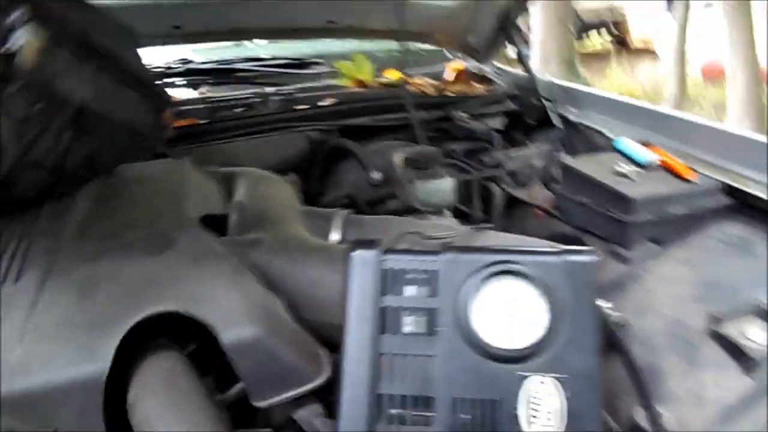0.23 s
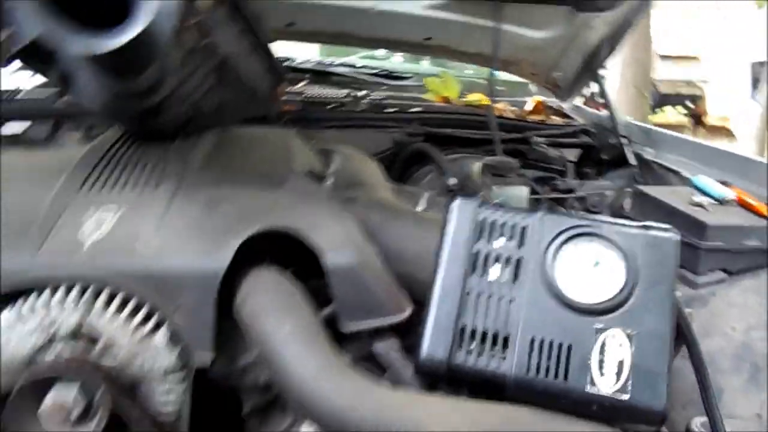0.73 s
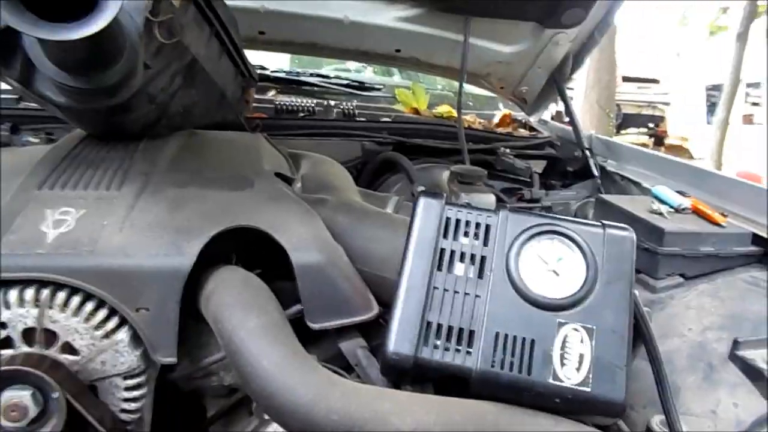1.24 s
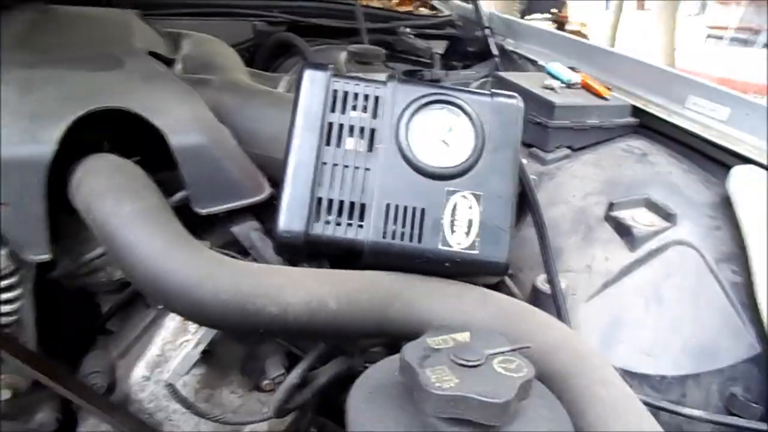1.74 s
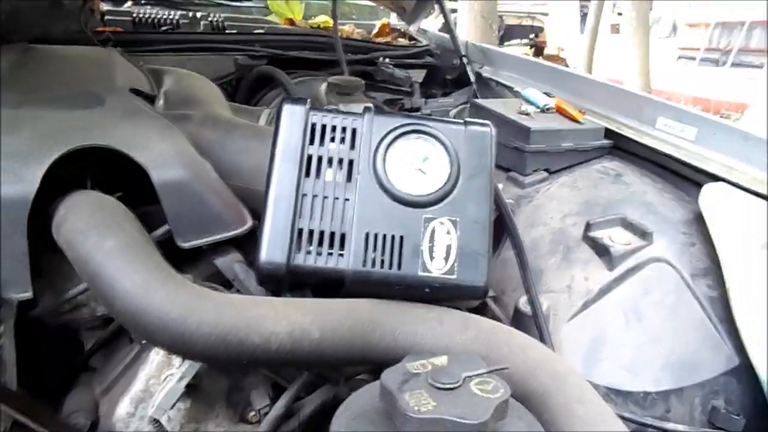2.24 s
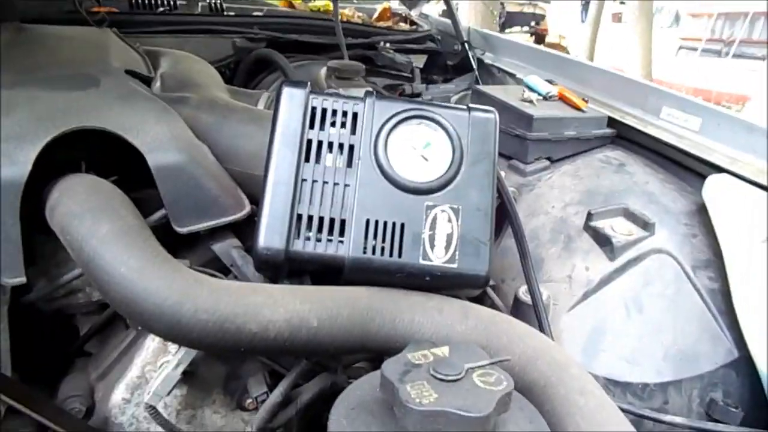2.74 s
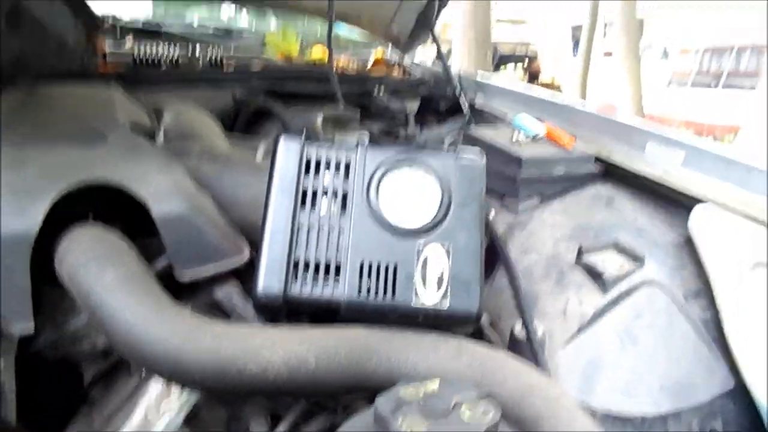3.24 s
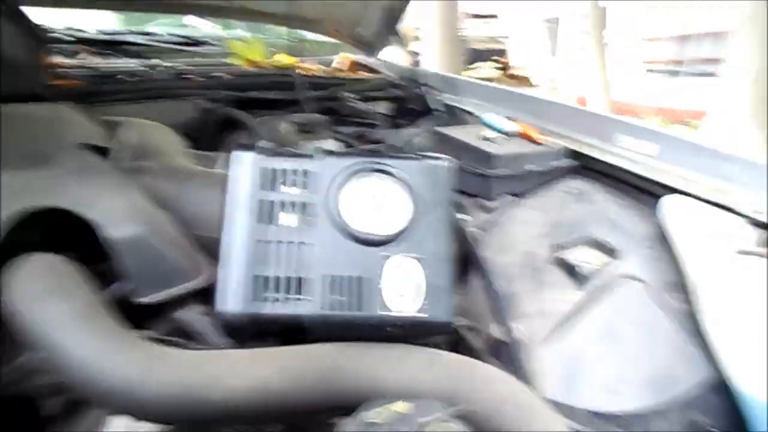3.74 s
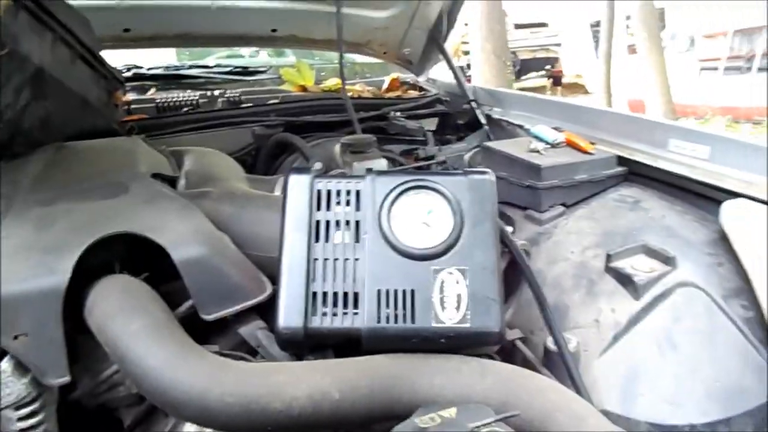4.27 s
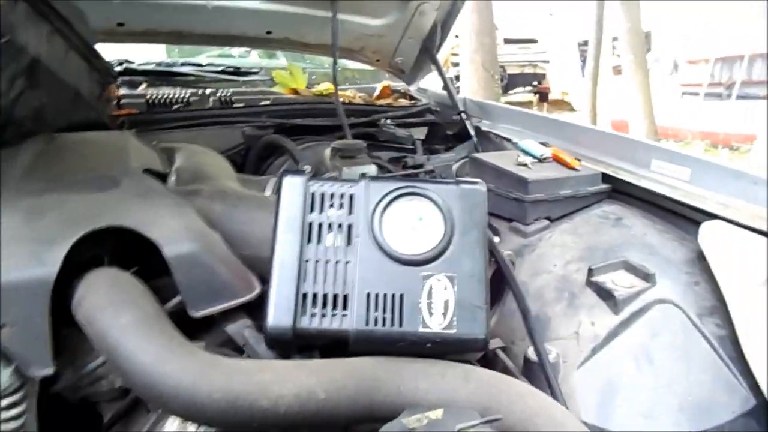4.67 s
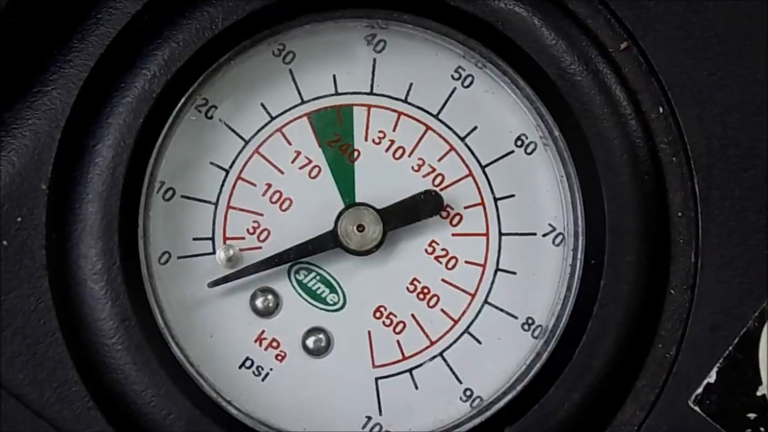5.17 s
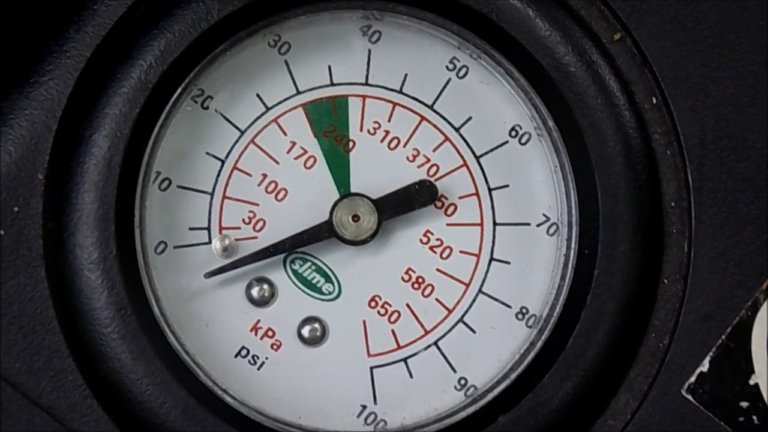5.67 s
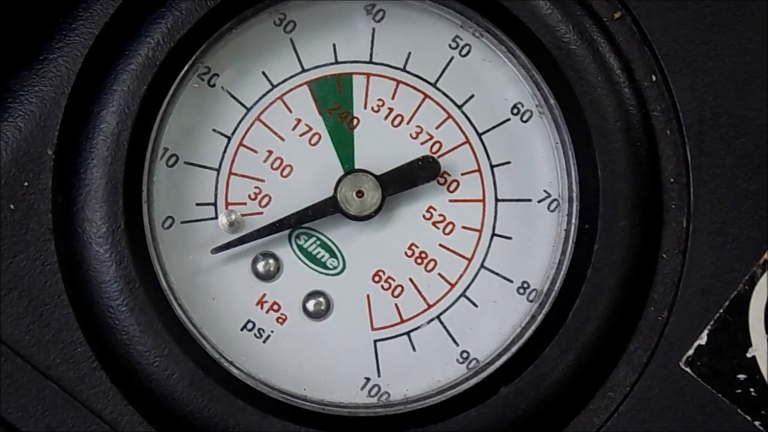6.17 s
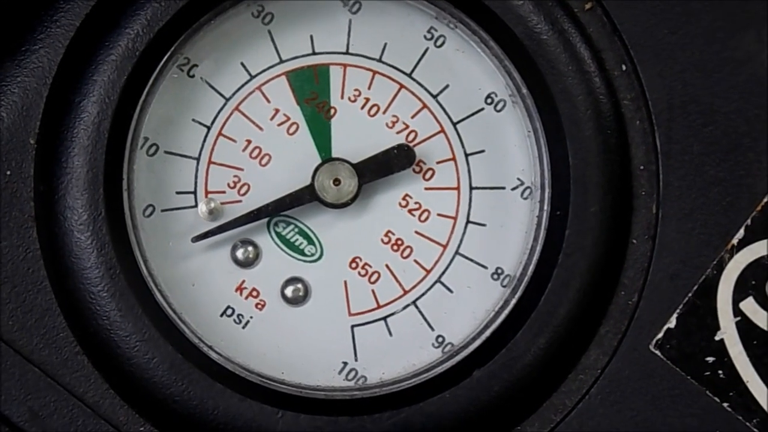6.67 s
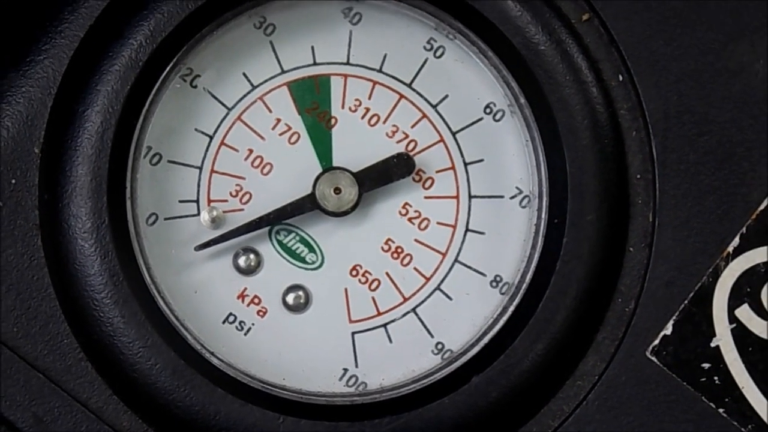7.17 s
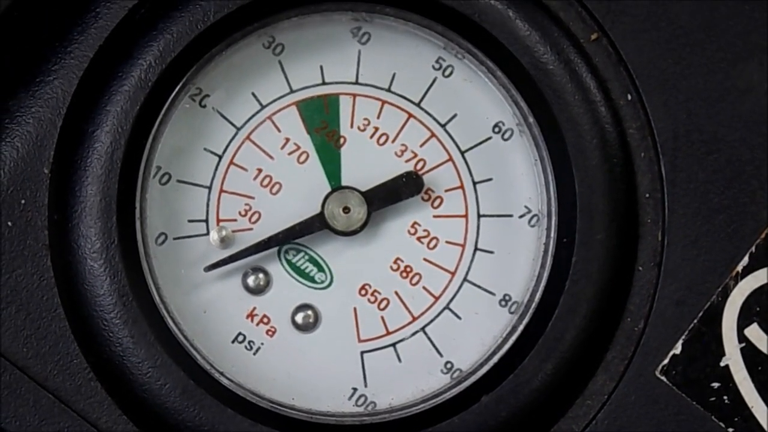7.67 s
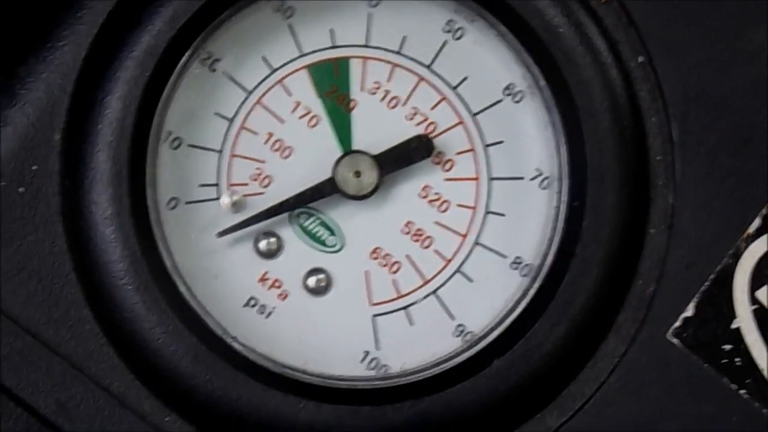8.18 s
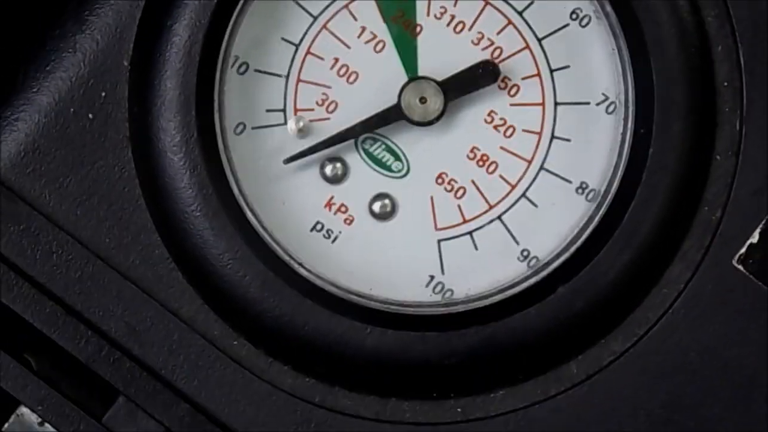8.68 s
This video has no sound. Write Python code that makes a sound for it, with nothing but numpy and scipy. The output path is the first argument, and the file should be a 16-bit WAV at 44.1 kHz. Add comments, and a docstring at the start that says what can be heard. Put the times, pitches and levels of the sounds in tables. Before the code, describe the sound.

A portable air pump hammers steadily at about thirty-five strokes a second, too fast to count, blending into a harsh, gritty buzz with a midrange whine and fan hiss. The close microphone shifts early, colouring the treble, and is bumped softly several times. The pump cuts off cleanly around five seconds with no run-down; far crickets shimmer faintly over dull, hushed outdoor air until the end.

```python
"""Open engine bay of a car, outdoors: a small piston air compressor pumps at about 35 strokes a second.
Each turn shapes filtered noise into valve snaps, a knock ringing the plastic case and rushes of air.
Harmonics of the crank make the drone and whine, and steady coloured noise the fan and brushes.
The hand bumps the moving microphone: short swelling thuds. The pump ends abruptly, leaving
a far chorus of crickets (throbbing noise bands) over quiet outdoor air (dull noise)."""
import sys
import numpy as np
from scipy import signal
from scipy.fft import rfft, irfft
from scipy.io import wavfile

SR = 44100
rng = np.random.default_rng(int(sys.argv[2]) if len(sys.argv) > 2 else 0)


def persist_wave(psi):
    """Save psi, clipped to +-1, as 16-bit WAV."""
    counts = np.round(np.clip(psi, -1, 1) * 32767).astype(np.int16)
    wavfile.write(sys.argv[1], SR, np.atleast_2d(counts).T)


N = 392925
TIME = np.arange(N) / SR
FIRST_SNAP_S, STOP_S = .0129, 5.094

# distant air: (frequency [Hz], density [dB per Hz, relative])
AIR_COLOUR = [(20, -25), (45, -11.5), (105, 1), (250, -5.5), (520, -9.5), (850, -5.5), (1150, -10),
              (1600, -10.5), (2600, -19.5), (4200, -24.5), (6000, -23.5), (9500, -27.5), (16000, -30)]
AIR_DB, AIR_RISE_DB_PER_S = -59.2, .55  # level until the pump stops, and slow growth afterwards

# far crickets: (centre [Hz], nominal width [Hz], relative level [dB], wing strokes [per s])
CRICKET_BANDS = [(5550, 150, -1.5, 54), (5760, 320, 0.5, 63), (6010, 130, -1, 31), (6300, 470, -8, 82),
                 (7170, 450, -7.5, 54), (7770, 150, -20.5, 33)]
CRICKETS_DB, CRICKETS_RISE_DB_PER_S = -58.5, 0.3  # as for the air
CHORUS_PERIOD_S, CHORUS_CREST_S = .35, 6.95  # spacing of the chorus waves, and the time of one crest
CHORUS_DEEPENS_DB_PER_S = 0.3  # the waves deepen as the insects fall into step

# bumps of the hand on the microphone:
# (time [s], peak level [dB], centre [Hz], width [octaves], swell time [s])
HAND_BUMPS = [(0.858, -33, 110, 1, 0.0088), (.861, -27.5, 310, 0.5, 0.0085), (3.207, -41, 220, 0.24, .005),
              (3.328, -38, 368, 0.55, .007), (4.627, -18.5, 380, 0.43, 0.0018),
              (4.631, -30, 274, 0.55, 0.0064)]

# the microphone's path: (time [s], angle round the pump [rad], settled share [0-1])
MIC_PATH = [(0, -0.5, 0), (.2, -0.1, 0.03), (.45, 1.4, 0.26), (.75, 0.6, 0.73), (1.5, 1.17, 0.85),
            (3.05, 2.0, 0.79), (3.5, 2.5, 0.92), (4, 2, 0.75), (5.09, 2, 0.8)]

# treble, caught more or less directly by the moving microphone: (time [s], level [dB])
TREBLE_SWING = [(0, -3.5), (.5, 0), (1.55, 1.2), (2.35, 0.4), (3.1, 0.8), (3.4, -2.1), (4.0, -.5),
                (4.5, -1.4), (5.09, 0)]

# crank speed, sagging a little under load and recovering: (time [s], speed [turns per s])
CRANK_SPEED = [(0.27, 35.67), (0.6, 35.489), (1.62, 35.476), (2.13, 35.404), (2.63, 35.477), (2.8, 35.21),
               (3.82, 35.696), (4.15, 35.624)]
MEAN_SPEED = np.mean(np.array(CRANK_SPEED)[:, 1])  # turns per s

# contacts and air puffs of one turn: (time after the outlet valve snap [ms], rise [ms], decay [ms],
# centre [Hz], width [octaves], relative level [dB], share of power that repeats [0-1])
STROKE_EVENTS = [ (0.0, 0.14, 2.5, 10960, 0.43, -22, 0.7), (0.1, 0.54, 19, 8730, 0.36, -35, 0.32),
                 (0.1, 0.42, 5.1, 2330, 0.81, -29.5, 0.46), (3.12, .9, 26, 720, 0.31, -25, 0.91),
                 (6.16, 0.34, 4, 1926, 0.51, -29.5, 0.69), (6.05, 1.1, 4.65, 510, 0.58, -34.5, 1),
                 (17.04, 0.28, 4.5, 10300, 0.22, -30.5, 0.7), (16.5, 3.7, 17, 3330, 0.72, -34, 0.33),
                 (24.5, 0.71, 4.7, 1060, 0.7, -33.5, 0.58), ]

# strong lines of case and gear: (multiple of crank speed, relative level at the first microphone
# position [dB], relative level at the settled position [dB])
CRANK_LINES = [(3, -67, -63), (4, -67, -65.5), (6, -62, -61.5), (8, -67.5, -59), (9, -58.5, -54),
               (10, -56.5, -53), (11, -54.5, -54.5), (12, -50, -50.5), (13, -53, -51.5), (14, -55, -54.5),
               (15, -81, -77.5), (16, -54, -48.5), (17, -50, -42.5), (18, -39.5, -38.5), (19, -53, -46),
               (20, -49, -46), (21, -60, -63), (22, -37, -41.5), (23, -40, -36.5), (24, -39.5, -79),
               (25, -46.5, -44), (26, -42.5, -39), (27, -53, -51), (28, -73, -46.5), (29, -58, -55),
               (30, -46, -52.5), (37, -45, -62), (38, -44, -56.5), (42, -53, -49.5), (43, -48, -58),
               (46, -45, -69), (47, -52, -50), (48, -58, -38.5), (49, -54.5, -41.5), (51, -45, -54.5),
               (57, -54, -47.5), (58, -58, -52)]

# what drives the lines (thud on the seat, piston knock, gear under load):
# (lowest multiple of crank speed, time after the valve snap [ms])
LINE_DRIVES = [(0, 7.93), (16, 3.73), (32, 5.0)]

# plastic case resonances that hold back and spread the knock: (centre [Hz], width [Hz])
CASE_RESONANCES = [(674, 40.4), (712, 33), (798, 170), (998, 19)]

# resonances and hollows of cylinder and grille: (centre [Hz], width [Hz], gain [dB])
GRILLE_CAVITIES = [(1318, 80, -9.5), (1600, 460, 3.5), (1986, 79, -12), (2055, 71, -7), (2200, 30, 2.5),
                   (2826, 59, 7.5), (4070, 590, 5.5), (5020, 250, -4.5), (5780, 270, 6.5), (7600, 220, 1.5),
                   (9470, 220, -0.5), (9870, 320, 2.5), (11120, 490, -10), (11500, 200, 7), (12150, 280, 7),
                   (12800, 300, 0), (13100, 300, 2.5), (16100, 840, -13)]

# cooling air and brush noise: (frequency [Hz], density [dB per Hz, relative])
FAN_COLOUR = [(80, -36), (200, -8), (500, -7.5), (900, 5), (2500, 2), (4500, -7), (7500, -3.5),
              (11000, -12.5), (15500, -7)]
FAN_DB = -37.5  # relative to the strokes

# borders between body, clatter, hiss and valve sizzle: (frequency [Hz])
BAND_EDGES_HZ = (1300, 5000, 11000)

# body, clatter, hiss and valve sizzle: (level [dB], share of the treble's swing,
# level change once the microphone has settled [dB])
BAND_LEVELS = [(-29.5, .15, -1.0), (-32.5, 0.18, .8), (-36, 0.79, 0), (-35.5, 0.94, -0.2)]


def from_db(db):
    """Decibels to gain."""
    return 10 ** (np.asarray(db) / 20)


def rms_one(x):
    """Scale to rms 1."""
    return x / np.sqrt(np.mean(x ** 2) + 1e-20)


def in_time(rows):
    """Each column of a curve at every sample."""
    s, *columns = np.transpose(rows)
    return [np.interp(TIME, s, column) for column in columns]


def noise(gain_at, size=N):
    """Random-phase noise of rms 1 whose colour is a function of frequency."""
    hz = np.maximum(np.arange(size // 2 + 1) * SR / size, 1)
    phases = np.exp(2j * np.pi * rng.random(len(hz)))
    return rms_one(irfft(gain_at(hz) * phases, size))


def spectrum(points):
    """Colour drawn through (frequency [Hz], level [dB]) points, straight over log frequency."""
    at, db = np.transpose(points)
    return lambda hz: from_db(np.interp(np.log(hz), np.log(at), db))


def hump(centre_hz, octaves):
    """Colour with one broad peak."""
    return lambda hz: np.exp(-.5 * (np.log2(hz / centre_hz) / octaves) ** 2)


def drift(rate_hz, order=64):
    """Slow chance of spread 1, drawn coarsely and stretched in time."""
    coarse = noise(lambda hz: 1 / (1 + (hz / order / rate_hz) ** 4), size=8192)
    return np.interp(np.arange(N) / order, np.arange(len(coarse)), coarse)


def distant_air():
    """Quiet outdoor air: dull noise that grows slowly once the pump has stopped."""
    quiet_s = np.maximum(TIME - STOP_S, 0)
    return from_db(AIR_DB + AIR_RISE_DB_PER_S * quiet_s) * noise(spectrum(AIR_COLOUR))


def wing_bands(throb=0.14, scatter=0.147):
    """Many far insects blur into bands around their wing resonances, throbbing with the wing strokes."""
    out = 0
    for centre_hz, width_hz, db, rate in CRICKET_BANDS:
        wings = noise(lambda hz: 1 / (1 + ((hz - centre_hz) / (0.88 * width_hz)) ** 2))
        strokes = np.cumsum(rate * (1 + scatter * drift(5.8))) / SR
        out = out + from_db(db) * wings * (1 + throb * np.sin(2 * np.pi * strokes))
    return rms_one(out)


def crickets():
    """The far chorus comes up slowly in the quiet, swelling in ever deeper waves."""
    quiet_s = np.maximum(TIME - STOP_S, 0)
    wave = np.cos(2 * np.pi * (TIME - CHORUS_CREST_S) / CHORUS_PERIOD_S)
    waves_db = CHORUS_DEEPENS_DB_PER_S * quiet_s * wave
    return from_db(CRICKETS_DB + CRICKETS_RISE_DB_PER_S * quiet_s + waves_db) * wing_bands()


def bumps(size=8192):
    """Each soft bump is a dull thud in the microphone's housing that swells and dies."""
    out, age = np.zeros(N), np.arange(size) / SR
    for s, db, centre_hz, octaves, swell_s in HAND_BUMPS:
        thud = noise(hump(centre_hz, octaves), size=size) * age * np.exp(-age / swell_s)
        at = round(s * SR)
        out[at:at + size] += from_db(db) * thud / np.abs(thud).max()
    return out


def hood_echo(x, strength=0.18, delay_s=.0031, delay_s_per_radian=0.000128):
    """The open hood mirrors the treble; the comb this makes slides as the microphone moves."""
    delay = delay_s + delay_s_per_radian * in_time(MIC_PATH)[0]
    return x + strength * np.interp(TIME - delay, TIME, x)


def grille(hz):
    """Gain of the cavities that the strokes and the fan noise pass through."""
    grid = np.linspace(0, SR / 2, num=2048)
    db = sum(peak_db / (1 + (2 * (grid - centre) / width) ** 2)
             for centre, width, peak_db in GRILLE_CAVITIES)
    return np.interp(hz, grid, from_db(db))


def bursts(turn, repeating):
    """Contacts and air puffs of the stroke: the part alike in every turn, or the part new each time."""
    period_ms = 1000 / MEAN_SPEED
    grid, out = np.linspace(0, 1, num=1024), 0
    for start_ms, rise_ms, decay_ms, centre_hz, octaves, db, share in STROKE_EVENTS:
        age = (grid * period_ms - start_ms) % period_ms
        shape = (1 - np.exp(-age / rise_ms)) ** 2 * np.exp(-age / decay_ms)
        shape = shape + np.exp(-(age + period_ms) / decay_ms)  # tail left from the turn before
        envelope = np.interp(turn % 1, grid, shape / shape.max())
        ringing = noise(lambda hz: grille(hz) * hump(centre_hz, octaves)(hz), size=len(turn))
        power = np.clip(share if repeating else 1 - share, 0, 1)
        out = out + from_db(db) * np.sqrt(power) * envelope * ringing
    return out


def cycle(harmonics, turn):
    """Play one turn's harmonics, given as rms values, round and round with the crank."""
    wave = irfft(harmonics, 16384) * 16384 / np.sqrt(2)
    return np.interp(turn % 1, np.linspace(0, 1, len(wave) + 1), np.append(wave, wave[0]))


def line_lag(orders):
    """Phase lag of each line: it follows the blow that drives it, later still past each case resonance."""
    hz = orders * MEAN_SPEED
    lowest, drive_ms = np.transpose(LINE_DRIVES)
    delay_s = drive_ms[np.digitize(orders, lowest) - 1] / 1000
    case_lag = sum(2 * np.arctan(2 * (hz - centre) / width) for centre, width in CASE_RESONANCES)
    return 2 * np.pi * hz * delay_s + case_lag


def machinery(turn, waver=0.18, rattle=0.1):
    """Case drone, gear whine and a fine clatter repeat each turn, shifting as the microphone moves."""
    angle, settled = in_time(MIC_PATH)
    size = round(SR / MEAN_SPEED)
    one_turn = np.arange(size) / size
    # two independent clatters, mixed by the microphone's angle
    clatter_a, clatter_b = [rfft(bursts(one_turn, True)) * np.sqrt(2) / size for _ in range(2)]
    orders, first_db, settled_db = np.transpose(CRANK_LINES)
    orders = np.round(orders).astype(int)
    lag = line_lag(orders)
    out = 0
    for line_db, weight in ((first_db, 1 - settled), (settled_db, settled)):
        lines = np.zeros_like(clatter_a)
        lines[orders] = from_db(line_db) * np.exp(-1j * lag)
        out = out + weight * cycle(lines, turn)
    # the lines waver slowly in the bay's standing waves, and quickly as the loose case rattles;
    # both use the settled levels
    for depth, rate_hz in ((waver, 1.0), (rattle, 15)):
        scrambled = lines * np.exp(2j * np.pi * rng.random(len(lines)))
        out = out + depth * drift(rate_hz) * cycle(scrambled, turn)
    clatter_a[orders] = clatter_b[orders] = 0  # clatter only fills the multiples between the lines
    return out + np.cos(angle) * cycle(clatter_a, turn) + np.sin(angle) * cycle(clatter_b, turn)


def fan():
    """Cooling air and brushes: steady noise coloured by the grille."""
    return from_db(FAN_DB) * noise(lambda hz: spectrum(FAN_COLOUR)(hz) * grille(hz))


def compressor(wobble_turns=0.0014, uneven_db=0.26, lowest_hz=95):
    """The crank turns a little unevenly and drives the strokes; the small case radiates no deep bass."""
    turn = np.cumsum(in_time(CRANK_SPEED)[0]) / SR
    turn = turn - np.interp(FIRST_SNAP_S, TIME, turn) + wobble_turns * drift(17.7)
    strokes = (machinery(turn) + bursts(turn, False)) * from_db(uneven_db * drift(22))
    hz = np.arange(N // 2 + 1) * SR / N
    radiated = rfft(strokes + fan()) * hz ** 4 / (hz ** 4 + lowest_hz ** 4)
    band = np.digitize(hz, BAND_EDGES_HZ)
    body, clatter, hiss, sizzle = [irfft(radiated * (band == k), N) for k in range(4)]
    parts = (body, clatter, hood_echo(hiss), hood_echo(sizzle))
    treble_db, settled = in_time(TREBLE_SWING)[0], in_time(MIC_PATH)[1]
    out = 0
    for (db, share, settled_db), part in zip(BAND_LEVELS, parts):
        out = out + from_db(db + share * treble_db + settled_db * settled) * rms_one(part)
    return out


def scene():
    """Air and insects, hand bumps, and the pump until its abrupt end."""
    running = np.clip((STOP_S - TIME) / .001, 0, 1)  # 1 ms fade
    return (distant_air() + crickets() + bumps() + compressor() * running)[None]


def record(dry):
    """The top is cut steeply at 16 kHz: 0.1 dB ripple below, 80 dB down above."""
    return signal.sosfilt(signal.ellip(12, .1, 80, 16000, fs=SR, output="sos"), dry)


dry = scene()
out = record(dry)
persist_wave(out)
```